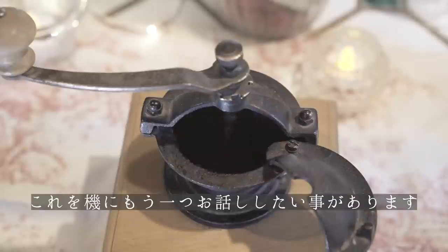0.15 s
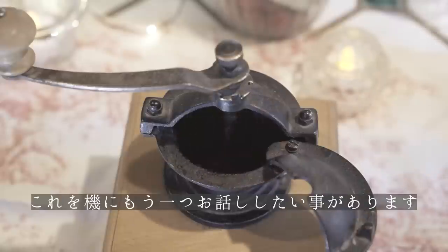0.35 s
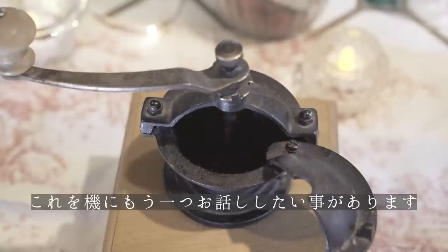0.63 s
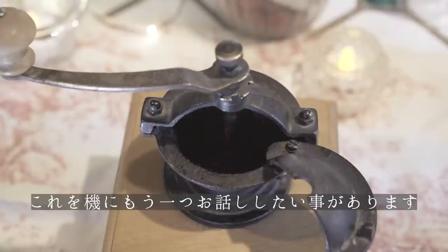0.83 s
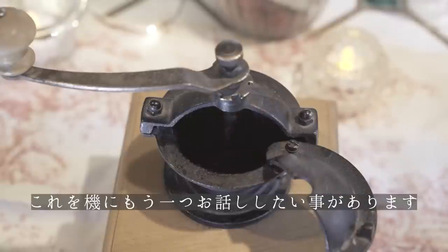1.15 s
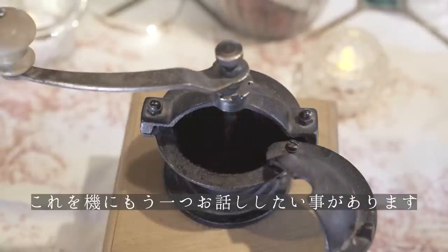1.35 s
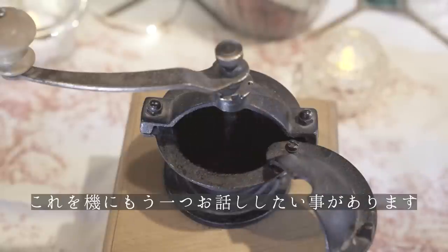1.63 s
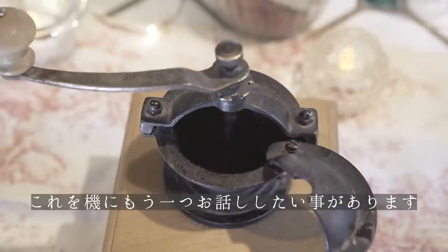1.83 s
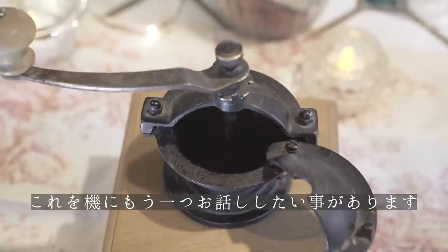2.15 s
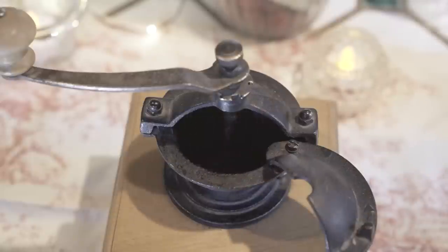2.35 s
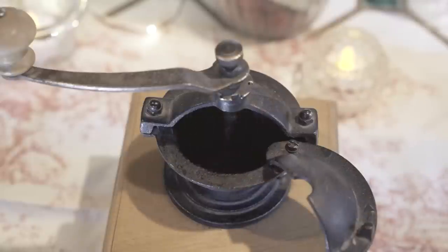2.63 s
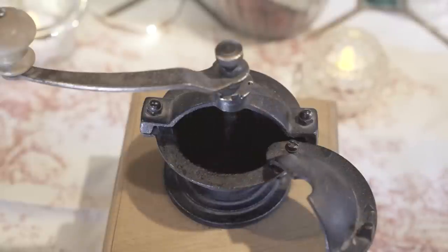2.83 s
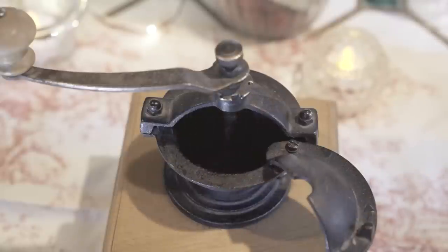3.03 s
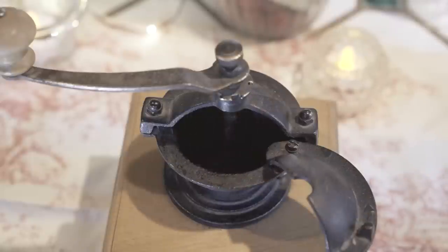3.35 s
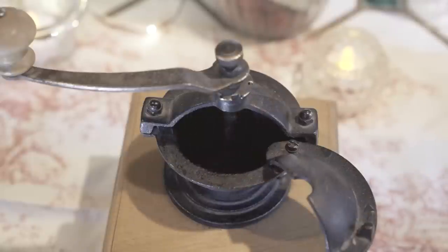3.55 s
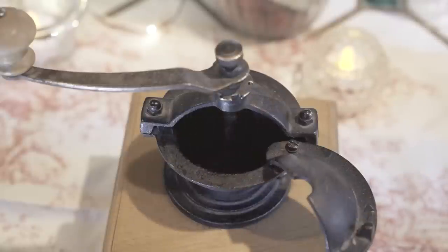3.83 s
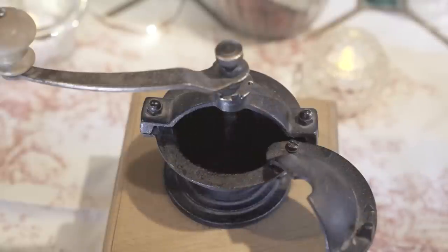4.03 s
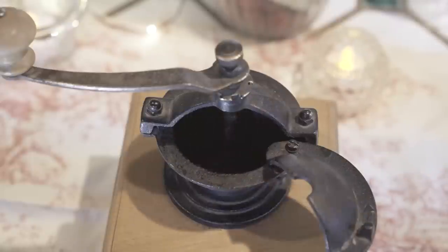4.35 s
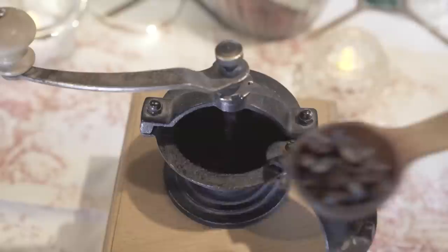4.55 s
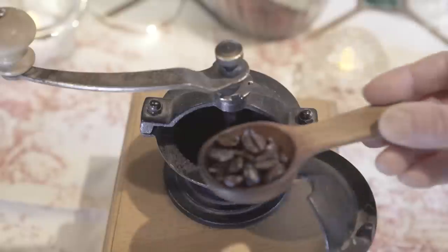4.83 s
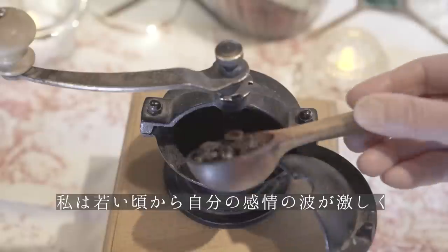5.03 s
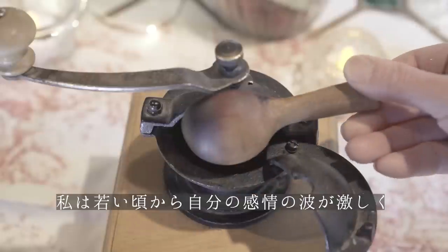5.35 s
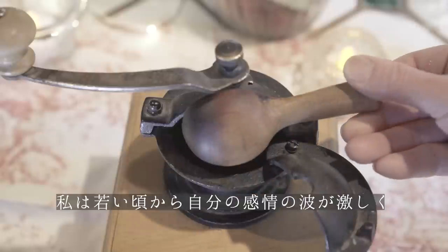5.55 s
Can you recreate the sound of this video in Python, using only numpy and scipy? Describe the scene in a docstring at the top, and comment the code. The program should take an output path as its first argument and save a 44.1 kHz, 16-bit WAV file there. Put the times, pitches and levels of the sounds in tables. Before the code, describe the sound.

A wooden spoon crunches through coffee beans in a canister, pauses, then knocks a metal grinder rim and tips the beans in with a bright rattle.

```python
"""A wooden spoon digs coffee beans out of a canister in a quiet kitchen: random bean contacts make the crunch,
single snaps the clicks. The canister rings through resonators, squeaks in wandering tones and bumps on the
table. Beans settle in the spoon, which knocks on the iron rim of a hand grinder and tips them into the
hopper. Behind: filtered-noise room air and sleeve, a low drone, and reverberation by convolution."""
import sys
import numpy as np
from scipy import signal
from scipy.fft import rfft, irfft
from scipy.io import wavfile
from scipy.ndimage import uniform_filter1d

SR = 44100
rng = np.random.default_rng(int(sys.argv[2]) if len(sys.argv) > 2 else 0)


def generate_wav(sig):
    """Save sig (samples, or channels by samples) to the path in sys.argv[1] as 16-bit PCM at SR."""
    pcm = np.round(np.clip(np.atleast_2d(sig).T, -1, 1) * 32767).astype(np.int16)
    wavfile.write(sys.argv[1], SR, pcm)


N = 250929
TIME = np.arange(N) / SR  # s

# Every movement swells, holds and fades; rise and fall are the times to change by SWELL_DB
SWELL_DB, SWELL_CURVE = 19, 1.53

# Room air spectrum: (frequency [Hz], density [dB])
AIR_SPECTRUM = [(12, -35), (20, -3.5), (48, 1), (65, -20.5), (134, -4), (277, -9), (328, -6), (367, -8.5),
                (434, -8), (590, -11), (718, -9), (1530, -19), (2200, -26.5), (11400, -33.5), (16000, -45)]
# Low room drone: (frequency [Hz], width [Hz], level [dB])
DRONE_LINES = [(39.7, 16, -74), (120.4, 10, -80.5)]
# Sleeve brushing as the arm moves out and back: (time [s], level [dB])
SLEEVE_LEVEL = [(0, -83), (.17, -68.5), (.35, -74.5), (.55, -88.5), (4.1, -97), (4.55, -77.5), (4.8, -84.5),
                (5.0, -90.5)]
# Sleeve spectrum: (frequency [Hz], density [dB])
SLEEVE_SPECTRUM = [(800, -9.5), (2900, 1.5), (4200, -4.5), (6000, -4.5), (9000, -9.5), (16000, -18)]
# Kitchen reverberation: (frequency [Hz], t60 [s], level before the send gain [dB])
KITCHEN_BANDS = [(154, 0.1, 6.5), (494, 0.094, -1), (1527, 0.19, -3.5), (4000, 0.19, -5.5),
                 (8400, 0.19, -5.5), (15200, 0.19, -7)]

# Canister bumping on the table: (time [s], level over 1.3 ms [dB])
TABLE_BUMPS = [(1.006, -44), (1.013, -25.5), (1.042, -26.5), (1.17, -50), (1.22, -31), (1.330, -32.5),
               (1.366, -29.5), (2.726, -37), (2.737, -30.5), (2.777, -37), (3.06, -33.5), (3.08, -31)]
# Dull thuds of the canister base under the push of the spoon: (time [s], peak [dB], frequency [Hz])
BASE_THUDS = [(1.16, -63, 120.8), (2.418, -47, 126.3), (2.56, -56, 108.5)]
# Bump spectrum: (frequency [Hz], density [dB])
BUMP_SPECTRUM = [(50, -32.5), (110, -15), (180, -10), (260, -4), (370, -1), (600, -7.5), (950, 4.5),
                 (1180, -1), (1450, -14.5), (2500, -25), (8000, -54)]
# Table top under the canister: (frequency [Hz], width [Hz], level [dB])
TABLE_MODES = [(266.3, 16, 4.5), (672, 22, 0)]

# Spoon drags along the canister wall: (full force [s], rise [s], hold [s], fall [s], level [dB])
WALL_DRAGS = [(1.11, 0.12, 0.048, .03, -51), (1.172, 0.038, .01, .15, -40), (2.38, 0.072, 0.025, .045, -39),
              (2.53, 0.14, .005, .09, -52), (2.66, .09, .005, .06, -58)]
# Rub spectrum: (frequency [Hz], density [dB])
RUB_SPECTRUM = [(60, -32), (150, -18.5), (280, -15.5), (420, -3.5), (800, 0), (1100, -2.5), (1400, -15.5),
                (2200, -11), (3200, -13), (8000, -33.5)]
# Spoon sticks and slips on the wall: (full force [s], rise [s], hold [s], fall [s], level before trim [dB])
WALL_SLIPS = [(2.328, .004, .001, .016, -20.5), (2.352, .008, .003, .015, -19),
              (2.384, .04, .002, .02, -38.5), (2.45, .07, .002, .02, -41.5)]
# Squeak partials: (frequency [Hz], width [Hz], level [dB])
SQUEAK_PARTIALS = [(1730, 26, -6), (1765, 26, -9), (1886, 80, -19), (4590, 45, -5), (6550, 27, -18)]
# Spoon edge chirps on the wall: (time [s], level [dB])
EDGE_CHIRPS = [(1.153, -26.5), (1.409, -42), (2.257, -34.5), (2.393, -29), (2.487, -31.5), (2.54, -34)]

# Beans shift in the spoon: (full force [s], rise [s], hold [s], fall [s], level [dB])
SPOON_SHIFTS = [(.98, .008, .03, .02, -47), (3.31, 0.032, .005, 0.029, -61.5),
                (3.39, .02, .003, 0.069, -48.5), (3.58, 0.05, .01, .1, -56), (5.18, 0.036, .04, 0.022, -56),
                (5.25, 0.026, .002, 0.018, -43.5)]
# Beans tap the hollow of the spoon: (time [s], level over 0.25 ms [dB])
BOWL_TAPS = [(0.978, -40), (.992, -31.5), (1.008, -24.5), (1.051, -28), (1.757, -17.5), (3.378, -21.5),
             (3.392, -31), (3.471, -35), (3.586, -35), (5.2332, -9.5)]
# Spectrum of beans in the spoon: (frequency [Hz], density [dB])
SETTLE_SPECTRUM = [(1500, -37.5), (2400, -18.5), (3600, -14.5), (4350, 7), (4900, -0.5), (5600, -4.5),
                   (7700, -1.5), (11000, -19), (16000, -32)]

# Spoon bowl strikes a rim: (time [s], level over 0.35 ms [dB], lowest [Hz], highest [Hz])
RIM_KNOCKS = [(2.3252, -12, 1760, 4660), (5.104, -10.5, 720, 2100), (5.3193, -18, 610, 1360)]
# Beans slide into the hopper: (full flow [s], rise [s], hold [s], fall [s], level [dB])
POUR_FLOW = [(5.283, 0.064, 0.11, 0.12, -32)]
# Pour spectrum: (frequency [Hz], density [dB])
POUR_SPECTRUM = [(100, -33.5), (300, -22), (700, -9.5), (1050, 2), (1500, -6), (2200, 2.5), (2800, -9),
                 (3700, -2.5), (6000, -10), (8600, 7), (11000, -13), (13500, 4.5), (16000, -8.5)]
# Grinder hopper: (frequency [Hz], width [Hz], level [dB])
HOPPER_MODES = [(1045, 100, -4.5), (2100, 150, -3.5), (3600, 110, 3), (4830, 150, -4), (8592, 88, -4),
                (13600, 70, 0), (14038, 70, 0)]
# Grinder wooden box: (frequency [Hz], width [Hz], level [dB])
BOX_MODES = [(130, 40, 6.5), (170, 44, 4.5), (237, 16, 13.5), (420, 23, -4), (716, 13, -8.5)]

# Single beans snapping on canister and hopper, loud and faint:
# (time [s], level before trim [dB], brightness [dB])
BEAN_SNAPS = [(1.1124, -18, -1), (1.1535, -13.5, -4), (1.1772, -12.5, -7), (1.2165, -14.5, -13.5),
              (1.3642, -21.5, -7.5), (1.4091, -16.5, -6), (1.5289, -17.5, -2.5), (1.6054, -7.5, 1),
              (1.7576, -20, -3.5), (1.7861, -15, 3.5), (1.8217, -16.5, 1), (1.827, -15.5, 10.5),
              (1.8903, -9, 5.5), (1.895, -12, 9), (2.0027, -37.5, 0), (2.0326, -42.5, -8),
              (2.0505, -43, -9), (2.086, -43, -8), (2.1004, -33, -8), (2.1075, -20, -1),
              (2.1123, -15, -1.5), (2.119, -12, 3), (2.1507, -25.5, -4), (2.1999, -24.5, -6),
              (2.236, -9.5, 4.5), (2.2569, -22.5, -8), (2.3033, -20, 3), (2.3145, -19, -1),
              (2.3254, -9.5, -2), (2.3369, -14, 1), (2.3624, -13.5, -0.5), (2.3904, -11, -4),
              (2.4894, -24, -13.5), (2.5406, -16, -10.5), (2.6727, -9, -0.5), (2.6755, -14.5, -1.5),
              (2.8258, -11, 0.5), (2.8685, -15, 2), (3.0688, -17, 2), (3.122, -23.5, 0.5), (5.232, -9, 4),
              (5.2863, -11, 1), (5.2885, -9.5, 11), (5.298, -7.5, 16), (5.321, -6.5, 6.5),
              (5.3444, -9, 7.5), (5.3538, -5.5, 8), (5.3669, -4, 9.5), (5.3773, -10, 5), (5.3953, -6, 7.5),
              (5.4103, -8, 4.5), (5.43, -11.5, 3.5), (5.4498, -23.5, 5), (5.468, -18.5, -2)]
# Pushes of the spoon through the beans: (full force [s], rise [s], hold [s], fall [s],
# rattle before trim [dB], fine crackle above the rattle [dB])
SPOON_PUSHES = [(0.997, 0.023, .003, 0.038, -44.5, -13), (1.07, .03, .04, .03, -56, -18.5),
                (1.122, 0.03, 0.052, 0.14, -32.5, -9), (1.377, 0.049, 0.098, 0.18, -41, -13.5),
                (1.602, 0.13, 0.0078, 0.25, -34.5, -1.5), (2.125, 0.021, .003, 0.036, -38, -1),
                (2.253, 0.029, 0.0025, 0.029, -47, -1), (2.346, 0.024, 0.047, 0.054, -31.5, -8.5),
                (2.532, 0.16, .14, 0.18, -38, -10.5), (2.763, 0.1, 0.084, 0.11, -38.5, -1),
                (2.923, 0.056, 0.074, .105, -33.5, 1.5)]
# Rattle spectrum: (frequency [Hz], density [dB])
RATTLE_SPECTRUM = [(150, -28), (500, -20), (900, -15), (1350, -21), (1700, -5.5), (2200, -10), (2850, -5.5),
                   (3400, 2), (4000, -1), (6300, 7.5), (8500, 2), (11000, -11.5), (16000, -25.5)]
# Fine crackle spectrum: (frequency [Hz], density [dB])
CRACKLE_SPECTRUM = [(2000, -40.5), (7000, -15.5), (9800, 4), (12500, 4), (16000, -0.5)]
# Canister: (frequency [Hz], width [Hz], level [dB])
CANISTER_MODES = [(899.5, 22, 0.5), (1705, 170, 2.5), (3363, 290, 1), (4520, 23, -3), (4750, 72, -3.5),
                  (6230, 77, -1), (7370, 260, -7), (8700, 90, -3), (9340, 170, -1), (10000, 200, 3.5)]


def from_db(db):
    """dB to amplitude."""
    return 10 ** (np.asarray(db) / 20)


def rms_one(x):
    """Scale to an rms of 1."""
    return x / np.sqrt(np.mean(x ** 2) + 1e-20)


def decay(t_s, t60_s):
    """Exponential decay, -60 dB at t60_s."""
    return from_db(-60 * t_s / t60_s)


def level(rows):
    """Gain over time from a dB curve; silent outside it."""
    times_s, levels_db = np.transpose(rows)
    return from_db(np.interp(TIME, times_s, levels_db, left=-200, right=-200))


def swell(full_s, rise_s, hold_s, fall_s, db):
    """Gain of one movement: it gathers force, holds and eases off."""
    before = np.maximum((full_s - TIME) / rise_s, 0)
    after = np.maximum((TIME - full_s - hold_s) / fall_s, 0)
    drop_db = SWELL_DB * (before + after) ** SWELL_CURVE
    return from_db(db - np.minimum(drop_db, 200))


def effort(movements):
    """Gain of several movements; their powers add."""
    return np.sqrt(sum(swell(*movement) ** 2 for movement in movements))


def at_hz(points, hz, column=1):
    """Read a table column on a log-frequency axis."""
    points = np.array(points)
    return np.interp(np.log(hz + 1), np.log(points[:, 0]), points[:, column])


def colour(x, spectrum, size=4096):
    """Causal minimum-phase filter with the given spectrum, by folding its cepstrum."""
    gain = from_db(at_hz(spectrum, np.fft.rfftfreq(size, 1 / SR)))
    cepstrum = irfft(np.log(gain))
    cepstrum[1:size // 2] *= 2
    cepstrum[size // 2 + 1:] = 0
    impulse_response = irfft(np.exp(rfft(cepstrum)))
    return signal.fftconvolve(x, impulse_response)[:len(x)]


def add(track, start_s, sound):
    """Mix a short sound in at a time."""
    start = max(round(start_s * SR), 0)
    track[start:start + len(sound)] += sound[:N - start]


def burst(t60_s, size=2048):
    """A puff of noise that dies away."""
    return rng.standard_normal(size) * decay(TIME[:size], t60_s)


def sized(sound, db, span_s):
    """Scale a blow to the energy of its level held for span_s."""
    return from_db(db) * sound * np.sqrt(span_s * SR / np.sum(sound ** 2))


def line(hz, width_hz):
    """A tone of rms 1, broadened by a random walk of its phase."""
    wander = np.cumsum(rng.standard_normal(N)) * np.sqrt(2 * np.pi * width_hz / SR)
    return np.sqrt(2) * np.sin(2 * np.pi * hz * TIME + wander)


def ringing(x, modes):
    """Response of a body to x: parallel two-pole resonators."""
    out = np.zeros(N)
    for hz, width_hz, db in modes:
        radius = np.exp(-np.pi * width_hz / SR)
        poles = [1, -2 * radius * np.cos(2 * np.pi * hz / SR), radius ** 2]
        gain = from_db(db) * (1 - radius ** 2) / 2
        out += gain * signal.lfilter([1, 0, -1], poles, x + 1e-18)  # offset avoids denormals
    return out


def grains(per_s, spread_db, cycles, pitch_count=18):
    """Random bean contacts: noise puff plus a ping lasting some cycles, evened to a steady slow level."""
    born = rng.random(N) < per_s / SR
    excess_db = spread_db * np.minimum(rng.exponential(1, N), 3)
    sizes = born * from_db(excess_db) * rng.choice([-1, 1], N)
    pitch_index = rng.integers(0, pitch_count, N)
    out, t = np.zeros(N), TIME[:512]
    for k, hz in enumerate(np.geomspace(3000, 15000, pitch_count)):
        ping = np.sin(2 * np.pi * hz * t) * decay(t, cycles / hz)
        contact = rms_one(burst(0.0037, size=512)) + 0.89 * rms_one(ping)
        out += signal.oaconvolve(sizes * (pitch_index == k), contact)[:N]
    power = out ** 2
    slow_power = np.abs(uniform_filter1d(power, size=1500))
    return out / np.sqrt(slow_power + 1e-3 * np.mean(power))


def background(air_db=-68.5):
    """Room air and sleeve as filtered noise, the drone as wandering low tones."""
    air = rms_one(colour(rng.standard_normal(N), AIR_SPECTRUM, size=16384))
    drone = sum(from_db(db) * line(hz, width_hz) for hz, width_hz, db in DRONE_LINES)
    sleeve = rms_one(colour(rng.standard_normal(N), SLEEVE_SPECTRUM))
    return from_db(air_db) * air + drone + level(SLEEVE_LEVEL) * sleeve


def kitchen(x, gap_s=0.003, size=22050):
    """Dense reflections from table and walls: noise bands, each with its own decay."""
    t, tail = TIME[:size], np.zeros(size)
    white = rfft(rng.standard_normal(size))
    hz = np.fft.rfftfreq(size, 1 / SR)
    onset = np.clip(t / gap_s - 0.5, 0, 1)
    edges_hz = np.geomspace(60, 17000, 15)
    for low_hz, high_hz in zip(edges_hz, edges_hz[1:]):
        centre_hz = np.sqrt(low_hz * high_hz)
        band = irfft(white * ((hz >= low_hz) & (hz < high_hz)), size)
        band = band * onset * decay(t, at_hz(KITCHEN_BANDS, centre_hz))
        band_share = 2 * (high_hz - low_hz) / SR
        gain = from_db(at_hz(KITCHEN_BANDS, centre_hz, column=2))
        tail += band * gain * np.sqrt(band_share / np.sum(band ** 2))
    return signal.fftconvolve(x, tail)[:N]


def bumps(thud_rise_s=0.02, thud_fall_s=0.035):
    """The canister rocks: short blows excite the table top; deep sine thuds when it is pressed down."""
    blows = np.zeros(N)
    for s, db in TABLE_BUMPS:
        push = signal.unit_impulse(2048) + from_db(-28) * burst(0.03)
        add(blows, s, sized(colour(push, BUMP_SPECTRUM), db, span_s=0.0013))
    thuds = np.zeros(N)
    for s, db, hz in BASE_THUDS:
        thuds += swell(s, thud_rise_s, 0, thud_fall_s, db) * np.sin(2 * np.pi * hz * (TIME - s))
    return blows + ringing(blows, TABLE_MODES) + thuds


def rubbing():
    """Wood and beans drag over the wall and shake the whole canister: filtered contacts."""
    slips = rms_one(colour(grains(per_s=900, spread_db=2.5, cycles=12.14), RUB_SPECTRUM))
    return effort(WALL_DRAGS) * slips


def squeak(trim_db=-4.0):
    """Stick-slip briefly locks on to a few wall modes, each a wandering tone."""
    partials = sum(from_db(db) * line(hz, width_hz) for hz, width_hz, db in SQUEAK_PARTIALS)
    return from_db(trim_db) * effort(WALL_SLIPS) * partials


def chirps(hz=3444, width_hz=200, rise_s=0.0031, hold_s=0.002, fall_s=0.012):
    """Brief slips of the spoon's edge sound one rough wall mode."""
    slips = effort([(s, rise_s, hold_s, fall_s, db) for s, db in EDGE_CHIRPS])
    return ringing(slips * line(hz, width_hz), [(hz, 2 * width_hz, 0)])


def settling():
    """Beans shift in the hollow of the spoon: light filtered ticks."""
    ticks = grains(per_s=300, spread_db=4, cycles=20)
    return effort(SPOON_SHIFTS) * rms_one(colour(ticks, SETTLE_SPECTRUM))


def spoon_taps():
    """Beans knock in the wooden bowl: a pulse with a few milliseconds of noise, filtered."""
    out = np.zeros(N)
    for s, db in BOWL_TAPS:
        push = signal.unit_impulse(2048) + 0.31 * burst(0.0069)
        add(out, s, sized(colour(push, SETTLE_SPECTRUM), db, span_s=0.00025))
    return out


def knocks(rebound_s=0.0012, rebound_db=-13.0):
    """Wood on metal: a short band-limited pulse and a quick rebound."""
    out = np.zeros(N)
    for s, db, low_hz, high_hz in RIM_KNOCKS:
        below = [(low_hz / 30, -55), (low_hz / 8, -30), (low_hz / 2, -13), (low_hz, 0)]
        above = [(high_hz, 0), (high_hz * 1.35, -14), (high_hz * 1.75, -26)]
        top = [(9000, -32), (11000, -50), (16000, -60)]
        pulse = sized(colour(signal.unit_impulse(2048), below + above + top), db, span_s=0.00035)
        add(out, s, pulse)
        add(out, s + rebound_s, from_db(rebound_db) * pulse)
    return out


def pouring(spoon_empty_s=5.44, run_out_db_per_s=1100):
    """The spoonful tumbles on to the burr as random contacts; the flow stops as the last bean leaves."""
    run_out_db = -run_out_db_per_s * np.maximum(TIME - spoon_empty_s, 0)
    flow = effort(POUR_FLOW) * from_db(run_out_db)
    impacts = grains(per_s=460, spread_db=2, cycles=14)
    return flow * rms_one(colour(impacts, POUR_SPECTRUM))


def snap_spectrum(brightness_db):
    """Spectrum of one snap: the brighter its crack, the less body."""
    body_db, crack_db = -5.5 - brightness_db, -4 + brightness_db
    body = [(300, body_db - 26), (1200, body_db - 18), (2400, body_db - 8), (3700, body_db + 1)]
    crack = [(7500, 0.00058), (9800, crack_db / 2), (12500, crack_db), (16000, crack_db - 5.5)]
    return body + crack


def bean_clicks(trim_db=-2.0, attack_s=0.00028, ring_t60_s=0.0088, ring_share=0.46,
                bounce_s=0.0037, bounce_db=-9):
    """Hard snaps, each with one bounce: a crack of noise and three brief random pitches."""
    out, t = np.zeros(N), TIME[:2048]
    attack = 1 - np.exp(-t / attack_s)
    for s, db, brightness_db in BEAN_SNAPS:
        spectrum = snap_spectrum(brightness_db)
        bounce_delay_s = bounce_s * rng.uniform(0.86, 1.9)
        for delay_s, gain_db in (0, 0), (bounce_delay_s, bounce_db):
            pitches_hz = rng.uniform(3500, 14500, (3, 1))
            ring = np.sin(2 * np.pi * pitches_hz * t).sum(axis=0) * decay(t, ring_t60_s)
            snap = (rms_one(burst(0.0068)) + ring_share * rms_one(ring)) * attack
            snap = colour(snap, spectrum, size=512)
            add(out, s + delay_s, sized(snap, db + trim_db + gain_db, span_s=0.00019))
    return out


def scooping(trim_db=-2.5):
    """Beans grind past each other ahead of the spoon; each push drives rattle and fine crackle."""
    contacts = grains(per_s=900, spread_db=3.5, cycles=15)
    rattle = effort([(*shape, db + trim_db) for *shape, db, _ in SPOON_PUSHES])
    crackle = effort([(*shape, db + fine_db + trim_db) for *shape, db, fine_db in SPOON_PUSHES])
    rattle = rattle * rms_one(colour(contacts, RATTLE_SPECTRUM))
    return rattle + crackle * rms_one(colour(contacts, CRACKLE_SPECTRUM))


def scene(near_room_db=-3.0, bean_low_hz=170):
    """The canister stands off to the side; the grinder is close to the microphone and sounds drier."""
    blows = bean_clicks() + knocks()
    at_grinder = TIME > 5

    digging = scooping() + blows * ~at_grinder
    canister = digging + ringing(digging, CANISTER_MODES) + squeak() + chirps()
    no_bass = signal.butter(2, bean_low_hz, "high", fs=SR, output="sos")
    far = signal.sosfilt(no_bass, canister) + bumps() + rubbing()

    filling = pouring() + blows * at_grinder
    grinder = filling + ringing(filling, HOPPER_MODES) + ringing(filling, BOX_MODES)
    near = grinder + settling() + spoon_taps()

    room = kitchen(far + from_db(near_room_db) * near)
    return (far + near + room + background())[None]


def record(dry, cutoff_hz=15850):
    """The deepest bass is rolled off, the highest peaks are rounded and the top is cut steeply."""
    dry = signal.sosfilt(signal.butter(2, 35, "high", fs=SR, output="sos"), dry)
    dry = 0.5 * np.tanh(dry / 0.5)
    return signal.sosfilt(signal.ellip(12, 0.2, 70, cutoff_hz, fs=SR, output="sos"), dry)


dry = scene()
out = record(dry)
generate_wav(out)
```